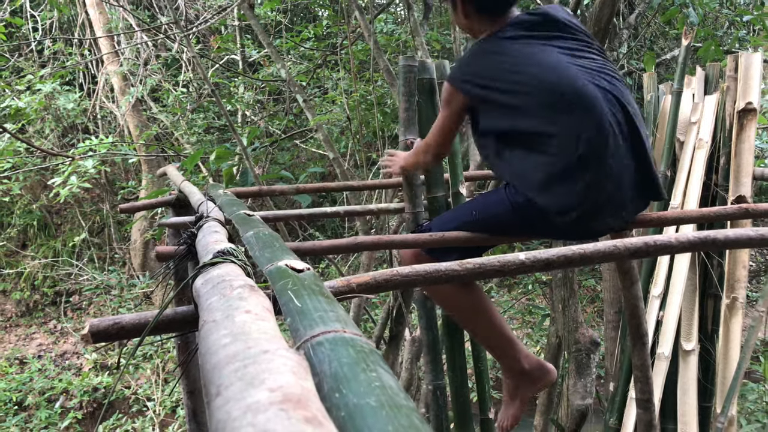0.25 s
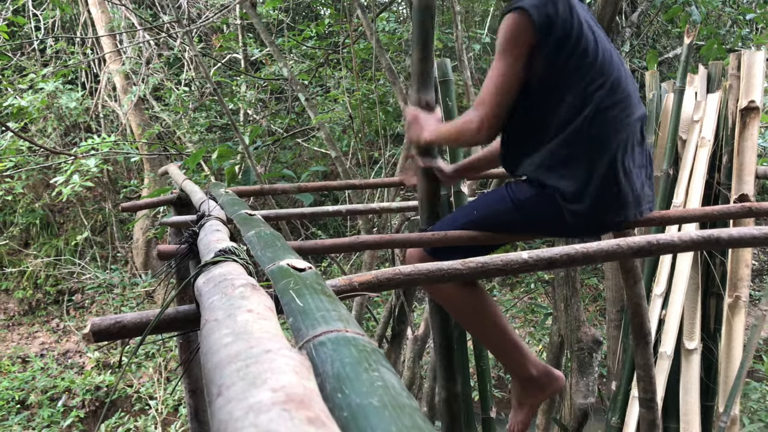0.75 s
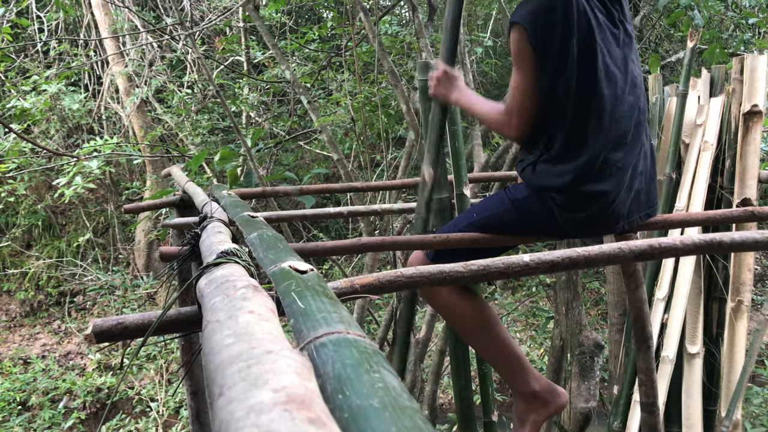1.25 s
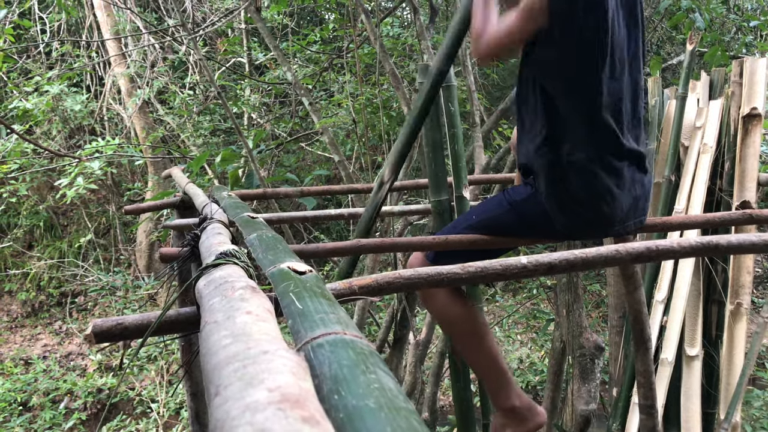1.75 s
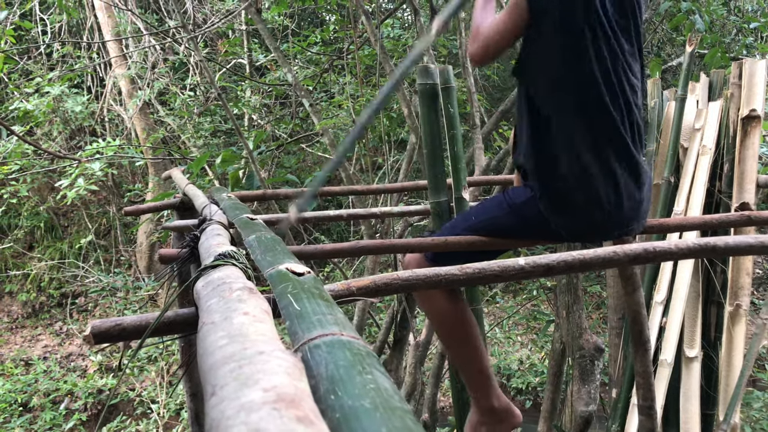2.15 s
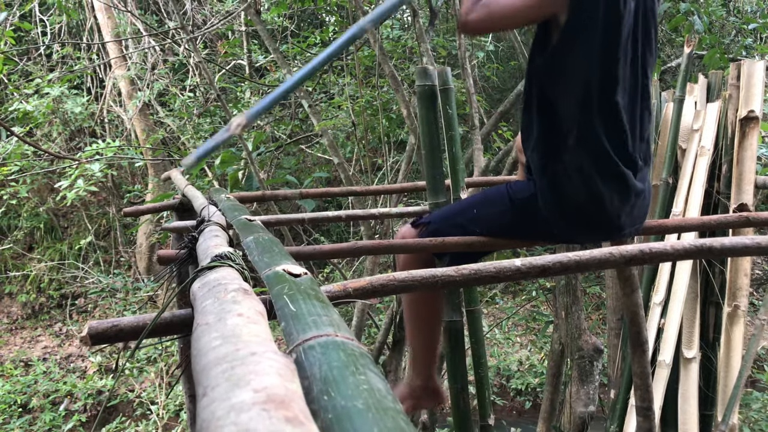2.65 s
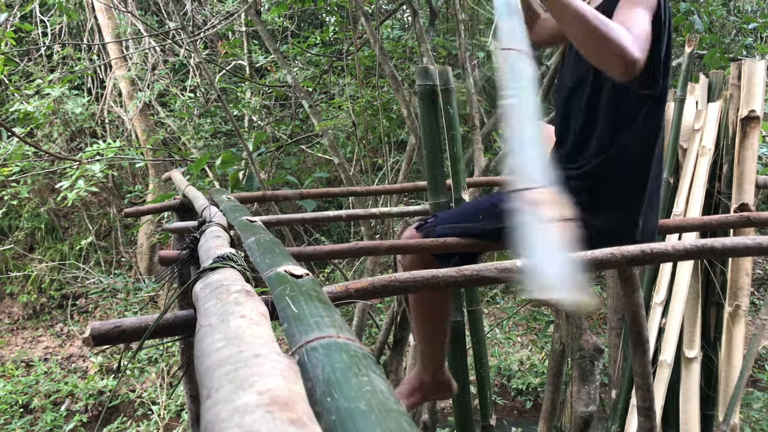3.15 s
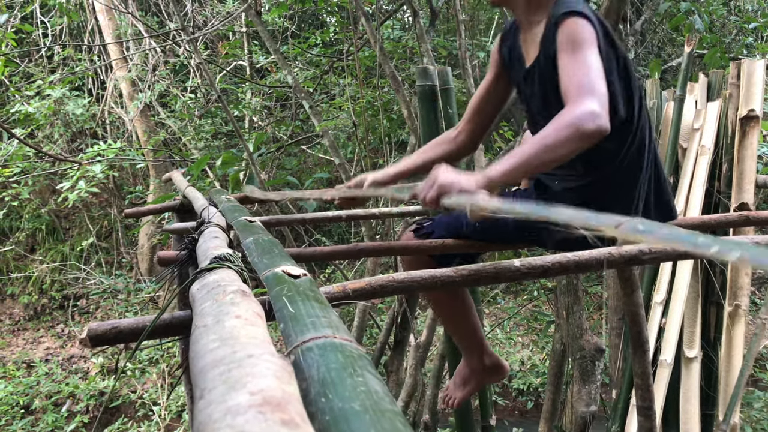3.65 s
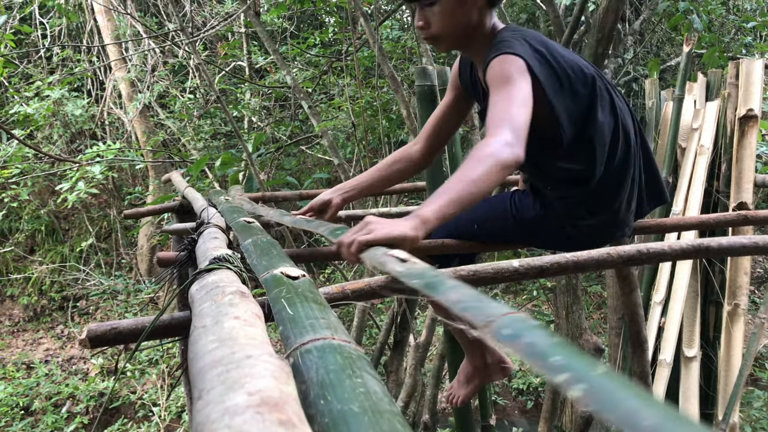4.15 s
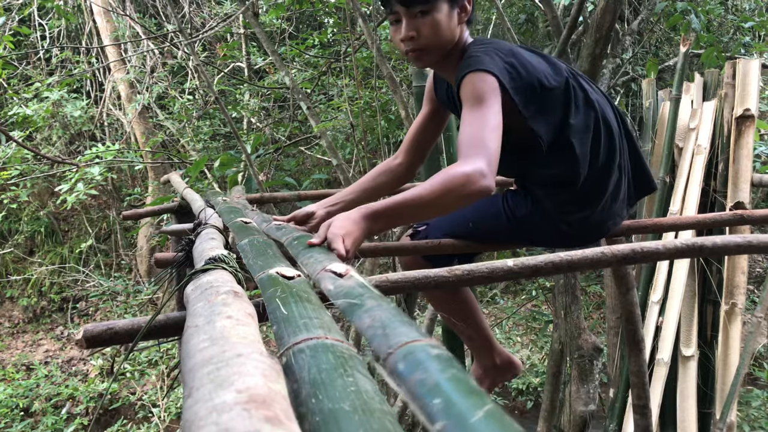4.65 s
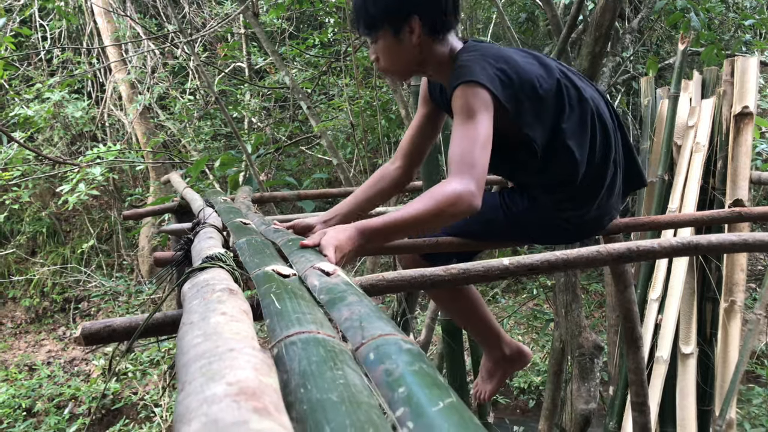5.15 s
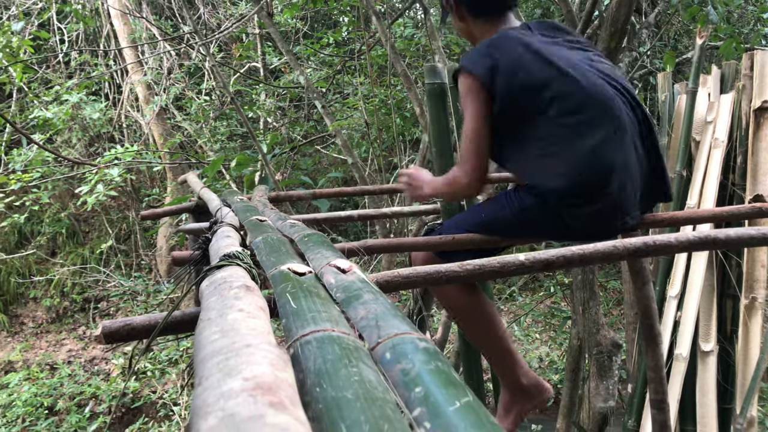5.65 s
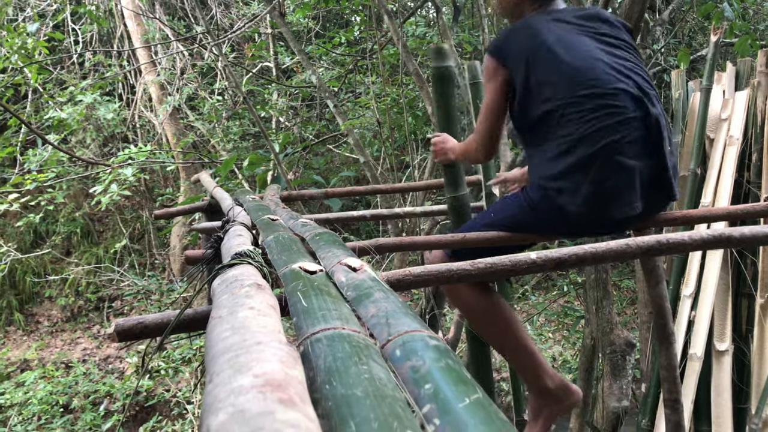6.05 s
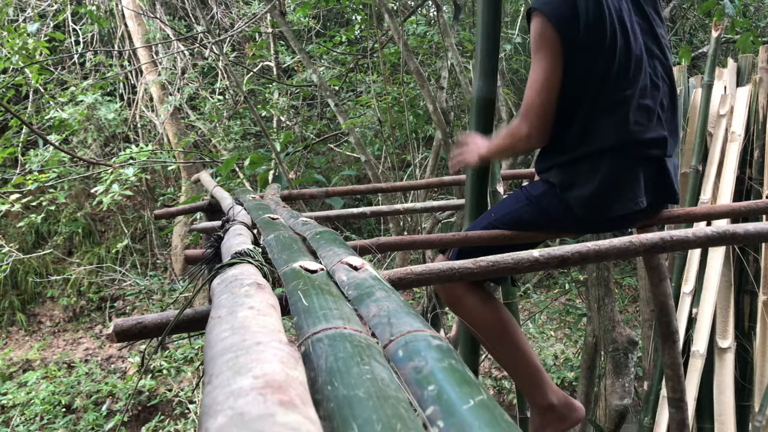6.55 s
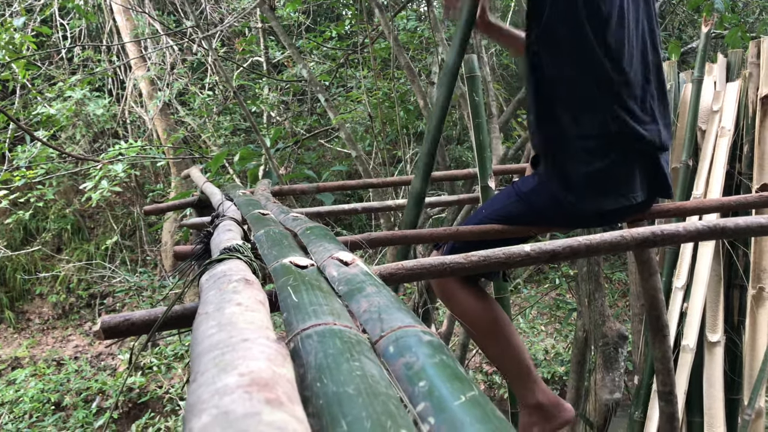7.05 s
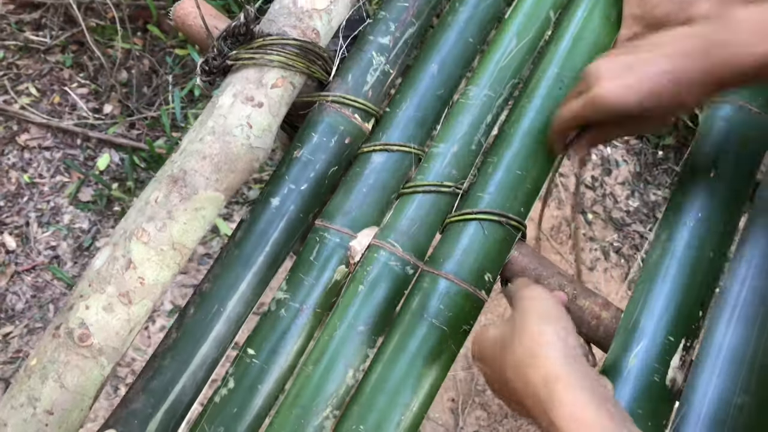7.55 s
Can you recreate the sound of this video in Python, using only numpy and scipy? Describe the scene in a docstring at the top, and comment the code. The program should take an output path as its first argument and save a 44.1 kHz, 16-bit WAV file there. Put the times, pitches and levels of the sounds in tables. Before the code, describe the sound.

Outdoors under high insect hiss, hollow bamboo clatters and slides with a short groan; after an abrupt cut, a binding strip crackles and snaps tight.

```python
"""Pole work on a bamboo scaffold in a forest; insects hiss throughout as fluttering narrow-band noise over soft air.
A builder draws a pole from the stack (modal knocks, scuffs), swings it over and drops it (knocks, frame boom),
slides it home (stick-slip rasp and hollow groan), then lifts the next pole with more knocks.
Near the end the level drops abruptly and fades back; the cicadas are gone, the chorus is a little louder.
Last, deck knocks and a lashing strip that rustles (fine crackle) and snaps tight (decaying noise bursts)."""
import sys
import numpy as np
from scipy import signal
from scipy.fft import rfft, irfft, next_fast_len
from scipy.io import wavfile
from scipy.ndimage import map_coordinates

SR = 44100
rng = np.random.default_rng(int(sys.argv[2]) if len(sys.argv) > 2 else 0)


def wrap_up_sound(samples):
    """Save the sound to the file named by the first command line argument, as 16-bit audio."""
    columns = np.atleast_2d(samples).T
    # keep every value between -1 and 1, then stretch to whole-number steps
    tamed = np.clip(columns, -1, 1)
    steps = np.round(tamed * 32767).astype(np.int16)
    wavfile.write(sys.argv[1], SR, steps)


N = 343980
TIME_S = np.arange(N) / SR
RING_S = np.arange(SR // 2) / SR

# forest air: frequency_hz, relative_density_db
AIR_COLOUR = [(20, -22.5), (45, 6.5), (70, -2), (120, -4), (200, -4.5), (350, -10), (600, -14),
              (1100, -16.5), (2000, -21), (3400, -25.5), (4500, -26.5), (8000, -29.5), (15000, -20.5)]
AIR_LEVEL_DB = -53
# high insect chorus: centre_hz, half_width_hz, relative_density_db
CHORUS_BANDS = [(6960, 150, -19.5), (8750, 260, -21), (9170, 78, -14.5), (9650, 130, -16),
                (10160, 60, -18.5), (11520, 570, -12.5), (12650, 550, -4), (13500, 380, -2.5),
                (13900, 480, -5), (15100, 550, -32.5)]
CHORUS_LEVEL_DB, CHORUS_STEP_DB = -51.5, 1.7  # step up at the break
# cicadas: centre_hz, half_width_hz, start_level_db, growth_db_per_s, swell_db, first_crest_s
CICADAS = [(4970, 80, -74.5, 0.94, 4.5, .44), (5215, 97, -71.5, 0.65, 0.5, .65)]
CICADA_CYCLE_S = 0.996
# fade after the break: after_break_s, gain_db
BREAK_FADE = [(0, -25), (.016, -12.5), (.05, -6), (.1, -0.5)]
BREAK_S, LOW_PASS_HZ = 7.284, 15800

# brushing of hands and clothes
BRUSH_LEVEL_DB, BRUSH_HZ, BRUSH_OCTAVES = -72, 3300, 0.38
# crowded scaffold modes: frequency_hz, relative_density_db, t60_s
FRAME_MODES = [(40, -24, 0.46), (80, 12, 0.63), (140, -8, 0.55), (199, 4.5, 0.83), (270, -7.5, 0.3),
               (374, 8.5, 0.29), (490, 6.5, 0.14), (630, 6, 0.14), (800, -3.5, 0.097), (1500, -39.5, 0.28)]
# lowest frame sway: frequency_hz, relative_level_db, t60_s
FRAME_SWAY = (67, -8, 0.99)
# blows that shake the frame: start_s, level_db, tilt_db_per_octave
THUDS = [(2.257, -35.5, -1.5), (3.653, -33, 3.5), (3.691, -42, -1.5), (3.901, -32.5, 3.5),
         (4.325, -43.5, 2), (4.735, -41, 0), (5.004, -47, -6), (5.92, -55, -4.5), (7.749, -53, 5)]

# modes of the laid deck, hollow and damped: frequency_hz, relative_level_db, t60_s
DECK_MODES = [(368, -17.5, 0.078), (477, -26, .08), (640, -9.5, 0.073), (823, -2, 0.045), (1090, -2, 0.062),
              (1166, -4, 0.06), (1370, -2, 0.049), (1640, -18, 0.049), (1830, -8, .04), (2100, -16, .03),
              (2900, -11, 0.059)]
# modes of the stacked poles and rails: frequency_hz, relative_level_db, t60_s
STACK_MODES = [(566, -3, 0.073), (820, 4, 0.057), (1000, -9, 0.12), (1430, -3, 0.044), (1540, 0, 0.042),
               (1880, 0.5, 0.033), (2176, -4, 0.075), (2430, 2, 0.034), (2610, 1, 0.051), (2830, -45, .05),
               (2980, -6, 0.068), (3385, 6, 0.054), (3770, -13, .04), (4100, 1, 0.021), (4760, -14, 0.032),
               (4900, -37, .03)]
# modes of the next pole, still upright: frequency_hz, relative_level_db, t60_s
NEXT_POLE_MODES = [(624, -13, 0.066), (800, -6, 0.033), (950, 0, 0.032), (1256, 4, 0.038), (1365, 0, 0.03),
                   (1537, 9, 0.027), (1830, 3, 0.024), (2090, 7, 0.037), (2310, 6, 0.036),
                   (2520, 16, 0.022), (2820, -8, 0.036), (2910, 7, 0.069), (3550, -27, .03),
                   (4400, -29.5, 0.027)]
# modes of the carried pole: frequency_hz, relative_level_db, t60_s
POLE_MODES = [(412, -22, .12), (590, -19, .1), (745, -20, .07), (974, -17, .07), (1155, -13, .08),
              (1276, -18, .08), (1490, -9, .07), (1700, -9, .068), (1900, -9, .07), (2070, -4, .042),
              (2325, 1, .048), (2535, -8, .045), (2834, -4, .037), (3010, -8, .028), (3175, -9, .037),
              (3335, -5, .032), (3700, -7, .022), (3880, -6, .035), (4110, -9, .028), (4265, -12, .028),
              (4780, -13, .018), (4930, -15, .018)]
# blows on the deck: start_s, level_db, bass_db, treble_db, edge_db, chatter_s, chatter_to_blow_db
DECK_KNOCKS = [(1.085, -53.5, 12, -26, -22, 0.0046, 6), (3.761, -48.5, 2, 1, -8, 0.045, 11),
               (5.0035, -31.5, 3, -16, -33, 0.0094, -4.5), (5.722, -53.5, 9, -20, -22, 0.011, 4),
               (7.415, -51, -2, 13, -1, 0.0023, -1), (7.441, -50, 10, -5, -6, 0.0081, 4),
               (7.567, -44, 15, -10, -22, 0.0034, -4), (7.598, -43.5, 10, 5, -7, 0.0055, 2),
               (7.618, -49.5, 1, -3, -11, 0.0043, 4)]
# blows in the stack: start_s, level_db, bass_db, treble_db, edge_db, chatter_s, chatter_to_blow_db
STACK_KNOCKS = [(.412, -52.5, 1, 2, -2, 0.0071, 12), (1.117, -51, -6, -6, -5, 0.007, 6),
                (2.2555, -32.5, -2, 4, -8, 0.0053, 5), (2.660, -44, -10, -6, -13, 0.0029, 22),
                (2.892, -49, 7, -7, -6, 0.015, 5)]
# blows on the next pole: start_s, level_db, bass_db, treble_db, edge_db, chatter_s, chatter_to_blow_db
NEXT_POLE_KNOCKS = [(5.9155, -42, 8, -15, -21, 0.0041, 3), (5.9205, -36.5, -2, -12, -33, 0.0095, 0.5),
                    (6.190, -43, 8, -12, -8, 0.012, 6), (6.307, -49, 16, -8, -18, 0.003, 0),
                    (6.4135, -41, -6, -11, -17, 0.0079, 15), (7.232, -51, 4, 13, -10, 0.0092, 15)]
# blows on the carried pole: start_s, level_db, bass_db, treble_db, edge_db, chatter_s, chatter_to_blow_db
POLE_KNOCKS = [(3.6475, -31, 0, -7, -16, 0.014, 10.5), (3.8885, -31.5, -22, -2, -23, 0.0016, -13),
               (3.8910, -17.5, -8.5, 0, -29.5, .004, -11.5), (3.9335, -35.5, 3, -1, -20, .002, -1.5),
               (3.9368, -37, -14, 4, -33, 0.0032, -12), (3.9445, -35, -9, 1, -18, 0.0026, 6),
               (3.9476, -32.5, -10, 2, -20, 0.0037, -8)]

# scuffs of pole on pole: start_s, length_s, level_db, centre_hz, width_octaves
SCUFFS = [(0.899, 0.025, -59, 2000, 0.71), (1.141, 0.073, -66.5, 2500, 1), (2.8, 0.33, -63.5, 3750, 0.45),
          (2.944, 0.063, -52.5, 2600, 0.74), (2.999, 0.019, -49.5, 3920, 0.37),
          (3.037, 0.015, -42.5, 3360, 0.54), (4.656, 0.033, -57, 2650, 0.48),
          (4.716, 0.087, -47, 3020, 0.5), (4.889, 0.049, -49, 3520, 0.34), (5.011, 0.038, -54, 3430, 0.74),
          (5.115, 0.015, -55.5, 1990, 0.25), (5.271, 0.051, -61.5, 3750, 0.26),
          (5.838, 0.016, -55, 2970, .7), (6.041, 0.051, -56.5, 3330, 0.99), (6.229, 0.24, -60.5, 2980, 1)]
# snaps of fibre and strip: start_s, level_db, centre_hz, width_octaves, decay_s
SNAPS = [(2.3164, -50.5, 2720, 0.82, 0.00033), (4.423, -46.5, 5170, 0.6, 0.0032),
         (5.028, -55, 5000, 1.4, 0.0012), (5.0835, -53, 3680, 0.41, 0.0043),
         (6.2163, -46.5, 8340, 0.94, 0.0013), (7.609, -54, 3500, 0.88, 0.004),
         (7.72, -46, 2870, 1.1, 0.0031), (7.7475, -31, 6200, 2.7, 0.00089),
         (7.7483, -28.5, 4600, 0.4, 0.0043), (7.784, -44, 7000, 1.8, 0.0037)]
# pulls on the lashing strip: start_s, length_s, start_level_db, easing_db_per_s
PULLS = [(7.371, 0.19, -47, -25), (7.565, 0.2, -49.5, -50), (7.744, .05, -37.5, -300)]
PULL_RISE_S, PULL_RELEASE_S = 0.008, 0.015
# colour of the strip's rustle: frequency_hz, relative_gain_db
RUSTLE_COLOUR = [(59, -27), (100, 0.5), (199, -0.5), (381, -15), (420, -6), (941, -10), (1870, -11.5),
                 (6340, -16.5), (7570, -19), (11000, -19), (14300, -54), (22000, -120)]
# shoves of the pole over the rails: start_s, length_s, rasp_db, bite_db, groan_db
SHOVES = [(3.975, .14, -50.5, -75, -53.5), (4.112, 0.083, -48.5, -60, -45.5),
          (4.216, .11, -47.5, -49, -45.5), (4.334, 0.074, -58, -60, -53), (4.414, 0.073, -51, -52, -60),
          (4.519, 0.023, -61, -65, -49), (4.575, .04, -56, -59, -62)]
GRIP_S, EASE_DB_PER_S, LET_GO_S = 0.0067, -34, 0.014
BITE_HZ, BITE_OCTAVES = 4130, 0.2
# colour of the rasp: frequency_hz, relative_gain_db
RASP_COLOUR = [(500, -10), (1100, -0.5), (1700, -5), (2200, 0.5), (2800, -3), (3600, 6), (4400, 3.5),
               (5200, -2), (6300, -2.5), (7100, -6), (7700, -4), (9500, -7), (14000, -27)]
# air column of the sliding pole: frequency_hz, width_hz, relative_level_db
AIR_COLUMN = [(395.4, 11, 5.5), (413, 16, -4), (505, 35, -6)]


def amp(db):
    """Decibels to gain."""
    return 10 ** (np.asarray(db) / 20)


def evened(x):
    """Scales to rms 1."""
    return x / np.sqrt(np.mean(x ** 2) + 1e-20)


def burst(x, level_db):
    """Scales a short sound so that its energy equals 10 ms at the given level."""
    return amp(level_db) * x / np.sqrt(np.sum(x ** 2) / (SR / 100))


def read(points, hz):
    """Interpolates (Hz, value) points on a log-frequency axis."""
    point_hz, value = np.transpose(points)
    return np.interp(np.log(hz + 1), np.log(point_hz), value)


def add(mix, start_s, sound):
    """Mixes a sound in at its start time."""
    part = mix[round(start_s * SR):][:len(sound)]
    part += sound[:len(part)]


def coloured(x, db_at):
    """Causal minimum-phase filter whose gain in dB is the given function of frequency."""
    size = next_fast_len(len(x) + 4096)
    hz = abs(np.fft.fftfreq(size, 1 / SR))
    log_gain = np.log(amp(db_at(hz)) + 1e-4)
    response = np.exp(np.conj(signal.hilbert(log_gain)))
    return np.fft.ifft(np.fft.fft(x, size) * response).real[:len(x)]


def hump(centre_hz, octaves):
    """A broad resonance, in dB over frequency."""
    return lambda hz: -40 * np.log10(1 + (np.log2((hz + 1) / centre_hz) / octaves) ** 2 / 4)


def shaded(x, db_at, size):
    """Weights short-time spectra by a dB field over frequency (rows) and time (columns)."""
    overlap = size * 3 // 4
    hz, t, z = signal.stft(x, SR, nperseg=size, noverlap=overlap)
    weighted = z * amp(db_at(hz[:, None], t[None]))
    return signal.istft(weighted, SR, nperseg=size, noverlap=overlap)[1][:len(x)]


def patches(hz, t, width_hz, length_s):
    """Smooth random field over frequency and time, rms 1."""
    where = np.broadcast_arrays(hz / width_hz, t / length_s)
    return evened(map_coordinates(rng.standard_normal((512, 256)), where, order=1, mode="wrap"))


def drift(limit_hz):
    """Slow noise below the given rate, rms 1."""
    spectrum = rfft(rng.standard_normal(N))
    return evened(irfft(spectrum * (np.fft.rfftfreq(N, 1 / SR) < limit_hz), N))


def grains(size, per_s, spread_db):
    """Random stick-slip clicks of uneven strength, rms 1."""
    strength = amp(spread_db * np.minimum(rng.exponential(1, size), 4))
    hits = rng.random(size) < per_s / SR
    return evened(strength * rng.standard_normal(size) * hits)


def stroke_of(start_s, length_s, level_db, rise_s, ease_db_per_s, release_s):
    """Gain of one push or pull: takes hold, changes steadily in dB, lets go."""
    t = np.maximum(TIME_S - start_s, 0)
    hold = amp(level_db + ease_db_per_s * np.minimum(t, length_s))
    release = np.exp(-np.minimum(np.maximum(t - length_s, 0) / release_s, 20))
    return (1 - np.exp(-t / rise_s)) * hold * release


def through_pole(x, ring_db):
    """Friction heard directly and through equally weighted modes of the pole wall."""
    ring = sum(amp(-60 * RING_S / t60_s) * np.sin(2 * np.pi * hz * RING_S) for hz, _, t60_s in POLE_MODES)
    return x + amp(ring_db) * signal.fftconvolve(x, ring / np.linalg.norm(ring))[:len(x)]


def air():
    """Soft noise, lumpy in the bass."""
    def lumpy(hz, t):
        return read(AIR_COLOUR, hz) + 3 * patches(hz, t, 64.2, 0.064) / (1 + (hz / 350) ** 2)

    noise = shaded(rng.standard_normal(N), lumpy, size=2048)
    high_pass = signal.butter(3, 35, "high", fs=SR, output="sos")
    return evened(signal.sosfilt(high_pass, noise)) * amp(AIR_LEVEL_DB)


def insects(bands, flutter_db, flutter_hz):
    """Many insects blur into narrow bands of fluttering hiss, rms 1."""
    hz = np.fft.rfftfreq(N, 1 / SR)
    power = sum(amp(db) ** 2 * np.exp(-((hz - centre_hz) / width_hz) ** 2) for centre_hz, width_hz, db in bands)
    hiss = irfft(rfft(rng.standard_normal(N)) * np.sqrt(power), N)
    return evened(hiss * amp(flutter_db * drift(flutter_hz)))


def chorus():
    """High insect hiss in which single callers stand out as thin lines."""
    hiss = insects(CHORUS_BANDS, flutter_db=0.2, flutter_hz=49)
    voices = shaded(hiss, lambda hz, t: 2.5 * patches(hz, t, 55, 0.8), size=2048)
    return evened(voices) * amp(CHORUS_LEVEL_DB + CHORUS_STEP_DB * (TIME_S >= BREAK_S))


def cicadas():
    """Two narrow hisses swell about once a second and slowly grow, until the break."""
    out = np.zeros(N)
    for hz, width_hz, level_db, growth_db_per_s, swell_db, crest_s in CICADAS:
        swell = np.cos(2 * np.pi * (TIME_S - crest_s) / CICADA_CYCLE_S)
        gain = amp(level_db + growth_db_per_s * TIME_S + swell_db * swell)
        out += insects([(hz, width_hz, 0)], flutter_db=1.3, flutter_hz=25) * gain
    return out * (TIME_S < BREAK_S)


def trees(x, wet_db, t60_s):
    """Trunks and leaves scatter back a faint, dull tail."""
    taps = grains(len(RING_S), 2000, 0.35) * amp(-60 * RING_S / t60_s) * (RING_S > 0.008)
    colour = [(500, -5.5), (2000, -14), (5000, -11), (12000, -20)]
    tail = coloured(taps, lambda hz: read(colour, hz))
    return x + amp(wet_db) * signal.fftconvolve(x, tail / np.linalg.norm(tail))[:N]


def brushing(swell_db=5, swell_hz=5):
    """Hands and clothes brush the poles: faint slips whose level swells at random."""
    slips = coloured(grains(N, 2500, spread_db=1.5), hump(BRUSH_HZ, BRUSH_OCTAVES))
    return amp(BRUSH_LEVEL_DB) * evened(slips * amp(swell_db * drift(swell_hz)))


def frame(rise_s=0.015):
    """Blows spread into the lashed frame: a blurred boom with frequency-dependent decay, over a low sway."""
    modes = np.array(FRAME_MODES)
    colour, t60_s = modes[:, :2], modes[:, ::2]
    sway_hz, sway_db, sway_t60_s = FRAME_SWAY
    sway = amp(-60 * RING_S / sway_t60_s) * np.sin(2 * np.pi * sway_hz * RING_S)
    out = np.zeros(N)
    for start_s, level_db, tilt_db in THUDS:
        def dying(hz, t):
            return read(colour, hz) + tilt_db * np.log2(hz + 1) - 60 * t / read(t60_s, hz)

        boom = shaded(rng.standard_normal(len(RING_S)), dying, size=1024) * (1 - np.exp(-RING_S / rise_s))
        add(out, start_s, burst(boom, level_db) + burst(sway, level_db + sway_db - tilt_db))
    return out


def snaps():
    """Fibres let go in a sharp, quickly dying crack."""
    out = np.zeros(N)
    for start_s, level_db, centre_hz, octaves, decay_s in SNAPS:
        crack = rng.standard_normal(len(RING_S)) * np.exp(-RING_S / decay_s)
        add(out, start_s, burst(coloured(crack, hump(centre_hz, octaves)), level_db))
    return out


def lashing(patchy_db=2.0):
    """Hands draw the strip round the poles: clumps of fine crackle."""
    def colour(hz, t):
        return read(RUSTLE_COLOUR, hz) + patchy_db * patches(hz, t, 540, 0.019)

    crackle = grains(N, 7000, spread_db=0.6) * amp(2.3 * drift(50))
    rustle = evened(shaded(crackle, colour, size=256))
    pulls = sum(stroke_of(start_s, length_s, level_db, PULL_RISE_S, ease_db_per_s, PULL_RELEASE_S)
                for start_s, length_s, level_db, ease_db_per_s in PULLS)
    return rustle * pulls


def scuffs():
    """Short runs of slips that start fast and ease off."""
    out = np.zeros(N)
    for start_s, length_s, level_db, centre_hz, octaves in SCUFFS:
        stroke = (1 - np.exp(-RING_S / (0.023 * length_s))) * np.exp(-(RING_S / length_s) ** 4)
        slips = through_pole(grains(len(RING_S), 1800, spread_db=0) * stroke, ring_db=-6)
        scuff = burst(coloured(slips, hump(centre_hz, octaves)), level_db)
        add(out, start_s, scuff * np.sqrt(length_s / 0.0097))  # energy grows with length
    return out


def slide(patchy_db=2.0, judder_db=2.5, arch=0.54):
    """Slips rasp in a colour that shifts with the contact and drive a hollow groan, loudest in mid-shove."""
    def colour(hz, t):
        return read(RASP_COLOUR, hz) + patchy_db * patches(hz, t, 357, 0.01)

    slips = grains(N, 3000, spread_db=3)
    rasp = evened(shaded(through_pole(slips, ring_db=-10.5), colour, size=256))
    # a hard edge bites in one narrow band
    bite = evened(coloured(grains(N, 1400, spread_db=2.5), hump(BITE_HZ, BITE_OCTAVES)))
    hollow = sum(amp(db) * width_hz * np.exp(-np.pi * width_hz * RING_S) * np.sin(2 * np.pi * hz * RING_S)
                 for hz, width_hz, db in AIR_COLUMN)
    groan = evened(signal.fftconvolve(slips, hollow)[:N] * amp(judder_db * drift(40)))
    out = np.zeros(N)
    for start_s, length_s, rasp_db, bite_db, groan_db in SHOVES:
        pressure = stroke_of(start_s, length_s, 0, GRIP_S, EASE_DB_PER_S, LET_GO_S)
        speed = abs(np.sin(np.pi * np.clip((TIME_S - start_s) / length_s, 0, 1))) ** arch
        out += pressure * (amp(rasp_db) * rasp + amp(bite_db) * bite)
        out += speed * amp(groan_db) * groan
    return out


def knocks(rows, modes, travel_at_1khz_s, click_db, chatter_per_s):
    """A blow and its chatter ring the modes; bending waves bring the treble first and the bass later."""
    size = len(RING_S)
    ring = sum(amp(db - 60 * RING_S / t60_s) * np.cos(2 * np.pi * hz * RING_S) for hz, db, t60_s in modes)
    ring[0] += amp(click_db)
    hz = np.fft.rfftfreq(2 * size, 1 / SR)
    bending = np.exp(-4j * np.pi * travel_at_1khz_s * np.sqrt(1000 * hz))  # delay falls as 1 / sqrt(Hz)
    ring = irfft(rfft(ring, 2 * size) * bending)[:size]
    out = np.zeros(N)
    for start_s, level_db, bass_db, treble_db, edge_db, chatter_s, chatter_db in rows:
        contact = grains(size, chatter_per_s, 0.67) * np.exp(-RING_S / chatter_s)
        contact *= amp(chatter_db) / (np.linalg.norm(contact) + 1e-9)
        contact[0] += 1
        tone = [(400, bass_db), (1400, 0), (3000, treble_db), (4500, treble_db),
                (6500, edge_db), (15000, edge_db - 6)]
        struck = signal.fftconvolve(contact, ring)[:size]
        add(out, start_s, burst(coloured(struck, lambda f: read(tone, f)), level_db))
    return out


def scene():
    """All the work on the scaffold, set in the forest."""
    forest = air() + chorus() + cicadas()
    work = brushing() + frame() + snaps() + lashing() + scuffs() + slide()
    work += knocks(DECK_KNOCKS, DECK_MODES, travel_at_1khz_s=0.001016, click_db=28, chatter_per_s=1800)
    work += knocks(STACK_KNOCKS, STACK_MODES, travel_at_1khz_s=0.0031, click_db=29.5, chatter_per_s=1500)
    work += knocks(NEXT_POLE_KNOCKS, NEXT_POLE_MODES, travel_at_1khz_s=0.003, click_db=25.5, chatter_per_s=1500)
    work += knocks(POLE_KNOCKS, POLE_MODES, travel_at_1khz_s=0.007, click_db=25.5, chatter_per_s=1500)
    return (trees(work, wet_db=-21, t60_s=0.4) + forest)[None]


def record(dry):
    """The level drops at the break and fades back; then a linear-phase low-pass."""
    fade_db = np.interp(TIME_S - BREAK_S, *np.transpose(BREAK_FADE)) * (TIME_S >= BREAK_S)
    low_pass = signal.firwin(511, LOW_PASS_HZ, window=("kaiser", 9), fs=SR)
    return signal.oaconvolve(dry * amp(fade_db), low_pass[None], "same")


dry = scene()
out = record(dry)
wrap_up_sound(out)
```